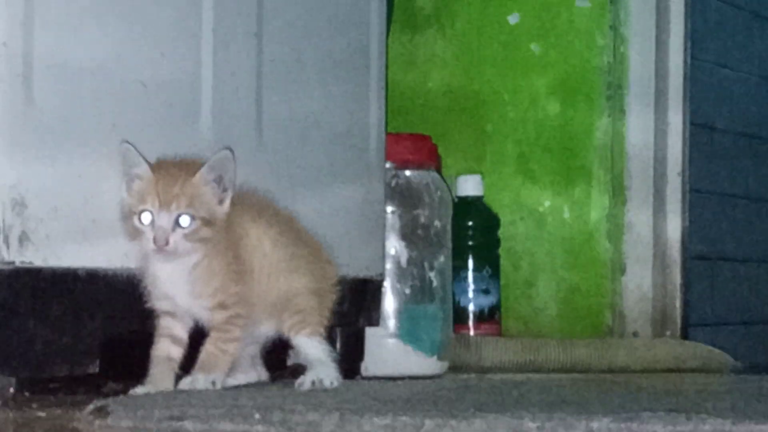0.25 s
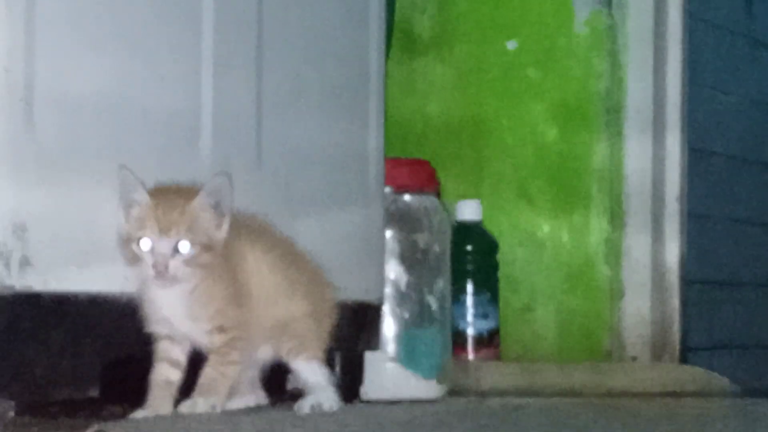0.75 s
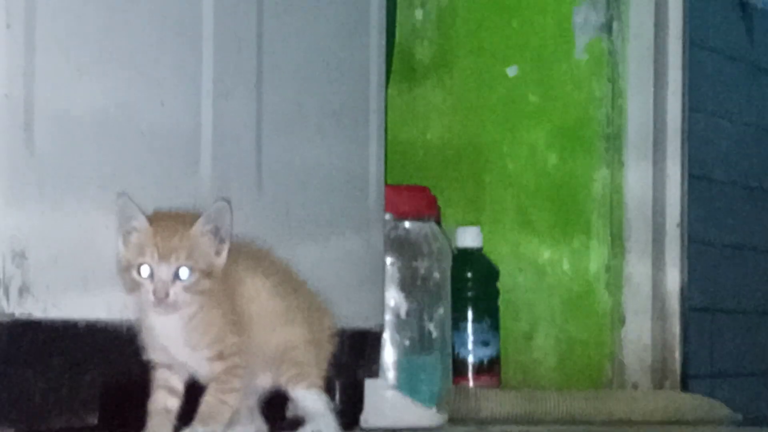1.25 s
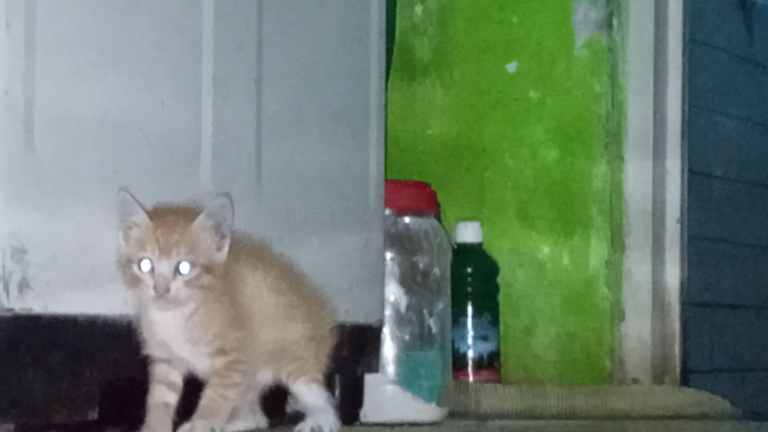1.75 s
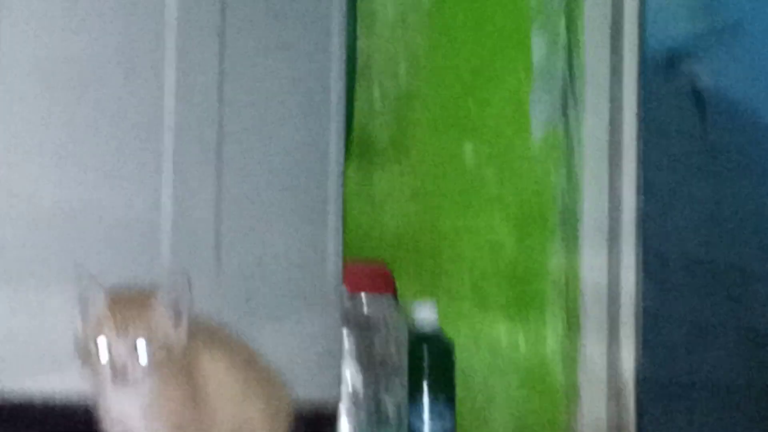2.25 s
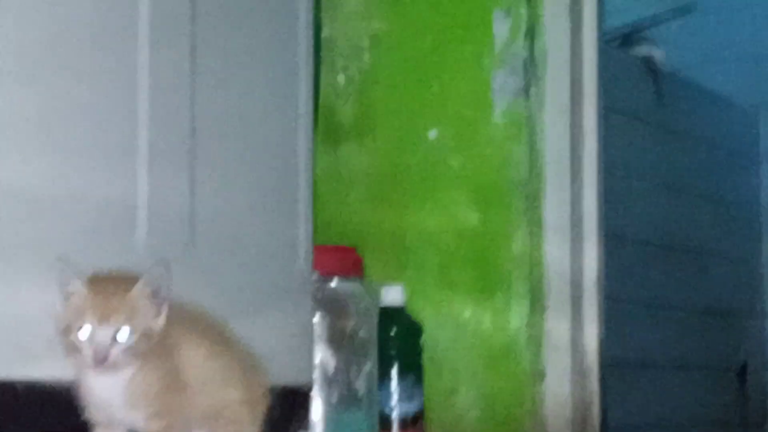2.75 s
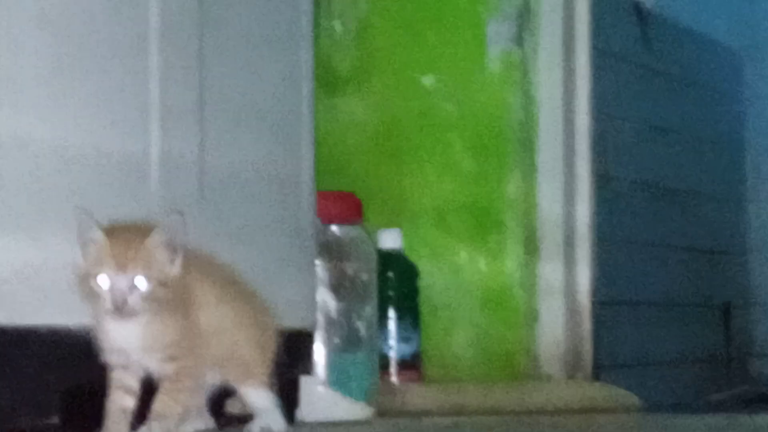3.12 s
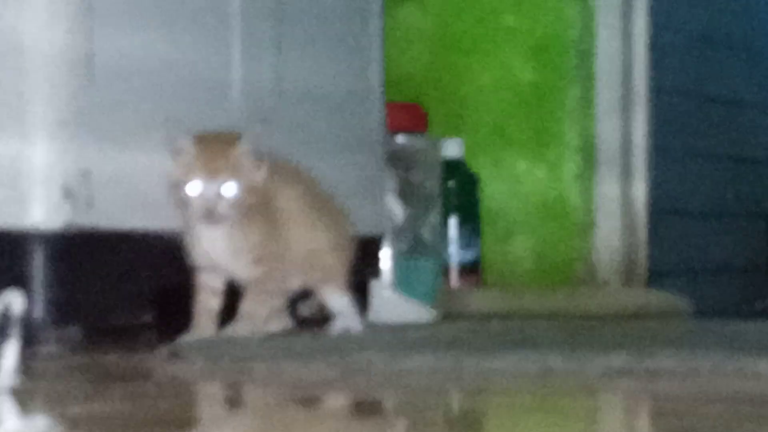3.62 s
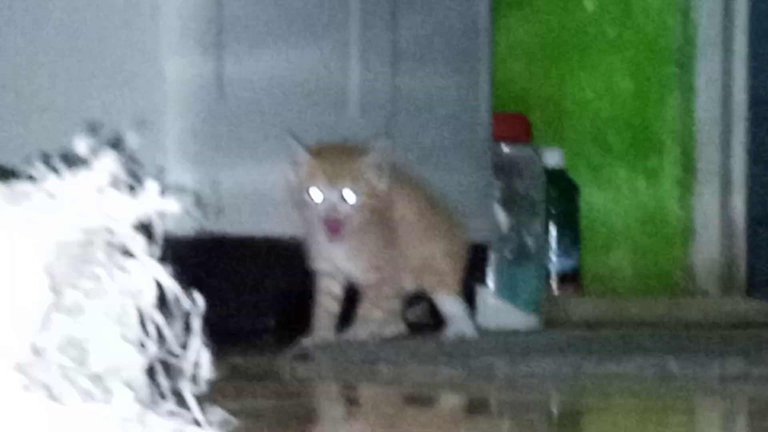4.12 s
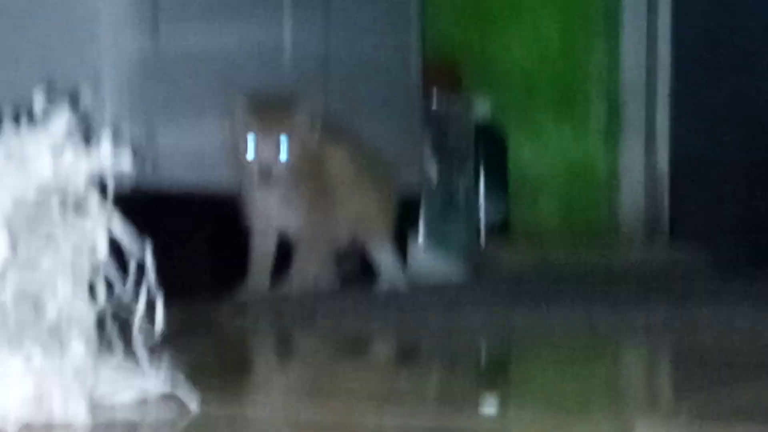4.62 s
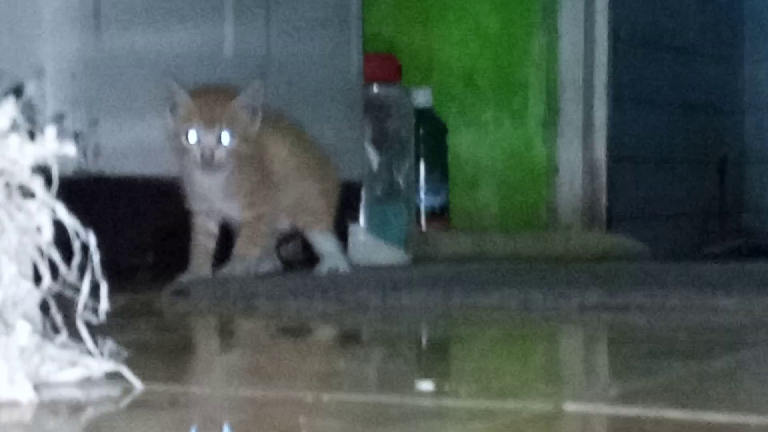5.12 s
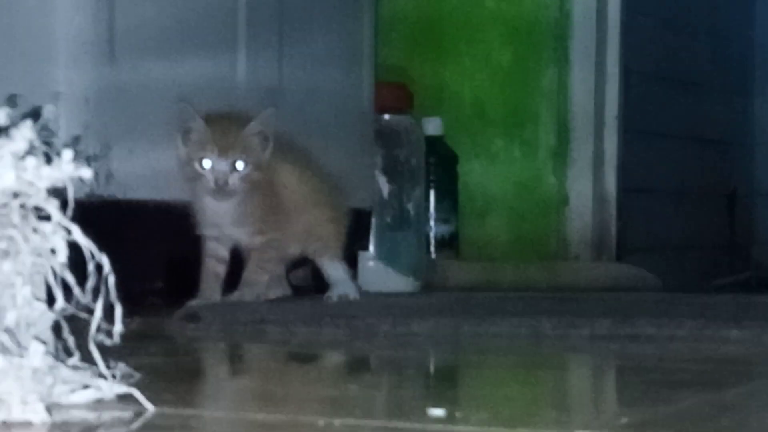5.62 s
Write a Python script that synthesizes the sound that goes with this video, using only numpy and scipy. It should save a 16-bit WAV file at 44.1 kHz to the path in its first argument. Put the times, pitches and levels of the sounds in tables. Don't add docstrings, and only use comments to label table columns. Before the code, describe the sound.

In a quiet tiled room at night, frogs and crickets chirr faintly outside. A small knock or two comes from the handheld microphone, then a kitten a few metres away growls low and long, opening into a rasp. Close mop strings scrape, rustle and snap, with dense scuffs and case knocks. A second, tenser growl rises near the end amid hard bright ticks.

```python
import sys
import numpy as np
from scipy import signal
from scipy.fft import rfft, irfft, next_fast_len
from scipy.io import wavfile
from scipy.ndimage import uniform_filter1d

SR = 44100
rng = np.random.default_rng(int(sys.argv[2]) if len(sys.argv) > 2 else 0)


def waveform_to_disk(signal):
    frames = np.transpose(np.atleast_2d(signal))
    scaled = np.clip(frames, -1, 1) * 32767
    samples = np.round(scaled).astype(np.int16)
    wavfile.write(sys.argv[1], SR, samples)


def convert_level_to_amplitude(level_db):
    exponent = np.asarray(level_db, float) / 20
    return 10 ** exponent


N = 258857
TIME = np.arange(N) / SR


def level(x, db=0):
    return x * convert_level_to_amplitude(db) / np.sqrt(np.mean(x ** 2))


def curves(table):
    s, *columns = np.transpose(table)
    return [np.interp(TIME, s, c, left=c[0] - 30) for c in columns]


def walk(rate):
    hold = int(SR / rate)
    steps = np.repeat(rng.standard_normal(N // hold + 1), hold)
    return 1.44 * uniform_filter1d(uniform_filter1d(steps, hold), hold)[:N]


def band(x, lo_hz, hi_hz, order=2):
    return signal.sosfilt(signal.butter(order, [lo_hz, hi_hz], "bandpass", fs=SR, output="sos"), x)


def colour(x, table):
    hz, db = np.transpose(table)
    size = next_fast_len(N)
    f = np.arange(size // 2 + 1) * SR / size + 1
    gain = convert_level_to_amplitude(np.interp(np.log(f), np.log(hz), db, left=-90, right=-90))
    return irfft(rfft(x, size) * gain, size)[:N]


def pulses(hz, jitter, scatter_db):
    period_luck, size_luck = rng.standard_normal((N // 40, 2)).T
    cycle = np.cumsum(hz * np.ones(N) / SR)
    uneven = np.exp(jitter * period_luck[cycle.astype(int)])
    cycle = np.cumsum(np.diff(cycle, prepend=0) * uneven)
    count = cycle.astype(int)
    clicks = np.diff(count, prepend=0) * convert_level_to_amplitude(scatter_db * size_luck[count])
    return clicks, cycle % 1


def ring(hz, t60, rise, size=300):
    t = np.arange(size) / SR
    build = np.clip(t / rise, 0, 1) ** 2
    decay = 10 ** (-3 * np.maximum(t - rise, 0) / t60)
    swing = np.sin(2 * np.pi * hz * t) * build * decay
    return swing / np.abs(swing).max()


def add(out, s, x):
    i = int(s * SR)
    out[i:i + len(x)] += x[:N - i]


# (frequency [Hz], level per Hz [dB])
ROOM_COLOUR = [(15, -60), (25, -9), (44, -14), (64, -5.5), (92, -9.5), (257, -19.5), (830, -23.5),
               (893, -24), (1820, -32), (2000, -27), (2600, -39), (4400, -120)]
# (time [s], length [s], centre [Hz], level [dB])
PATCHES = [(0., 0.068, 447, -72.5), (0.072, 0.068, 990, -67.5), (0.186, 0.12, 450, -75.5),
           (0.985, .05, 490, -64), (1.1, .11, 520, -70), (1.215, .075, 1420, -72), (1.325, .025, 160, -58),
           (1.43, .075, 620, -65), (2.28, .03, 1200, -73), (2.5, .22, 1380, -77), (2.78, .3, 335, -59),
           (5.19, .09, 260, -57), (5.36, .2, 265, -56), (5.36, .12, 900, -66), (5.468, .035, 130, -50),
           (5.18, .09, 1150, -69), (2.26, .2, 11200, -74), (2.52, .18, 11000, -73), (3.975, .035, 200, -50),
           (5.76, .11, 680, -60)]


def house():
    out = level(colour(rng.standard_normal(N), ROOM_COLOUR) * convert_level_to_amplitude(1.35 * walk(2.96)), -74)
    for s, length, hz, db in PATCHES:
        swell = np.hanning(int(length * SR))
        patch = level(band(rng.standard_normal(N // 10), hz / 1.12, hz * 1.13))
        add(out, s, convert_level_to_amplitude(db) * patch[:len(swell)] * swell)
    return out


# (frequency [Hz], level [dB])
SELF_NOISE = [(1500, -5), (4000, 3.5), (8000, -3), (11000, -5), (13500, -6.5), (15000, -4), (15800, -1),
              (16200, -14)]
# (time [s], level [dB])
WHINE = [
    (0, -99),
    (5.15, -88),
    (5.2, -71),
    (5.58, -80),
    (5.62, -92),
]


def electronics():
    hiss = level(colour(rng.standard_normal(N), SELF_NOISE) * convert_level_to_amplitude(1.0 * walk(5.7)), -78.5)
    whine_hz = 7690
    return hiss + convert_level_to_amplitude(curves(WHINE)[0]) * np.sin(2 * np.pi * whine_hz * TIME)


# (low edge [Hz], high edge [Hz], level over their curve [dB], pulses [per s], swell [dB])
FROGS = [(2208, 2450, -0.5, 110, 0.5), (2095, 2640, -8, 140, -3.5), (2882, 3440, -5.5, 150, -1),
         (4460, 5090, -13.5, 200, 1.5), (6080, 7260, -14, 340, 1)]
CRICKETS = [(8350, 9300, -4.5, 340, 1), (9180, 10200, -12, 170, 0.39), (7950, 10600, -16.5, 260, 0.71)]
# (time [s], low callers [dB], high callers [dB])
NIGHT = [
    (0.0, -62.5, -62),
    (2.71, -61, -61.5),
    (4.2, -60, -60),
    (5.17, -60, -69),
    (5.46, -59, -72.5),
    (5.87, -59.5, -68.5),
]


def chorus(callers, db):
    out = 0
    for lo_hz, hi_hz, own_db, rate, swell_db in callers:
        singers = 0
        for k in range(3):
            clicks, _ = pulses(rate * (1 + .2 * k), jitter=.15, scatter_db=5.5)
            singers = singers + clicks * (-1) ** k
        blur = level(singers) + 2.36 * rng.standard_normal(N)
        swell = convert_level_to_amplitude(swell_db * walk(4.0) + 0.76 * walk(25.04))
        out = out + level(band(blur, lo_hz, hi_hz, order=4), own_db) * swell
    return out * convert_level_to_amplitude(db)


def night():
    low_db, high_db = curves(NIGHT)
    return chorus(FROGS, low_db + 0.99) + chorus(CRICKETS, high_db - 0.13)


# (time [s], level [dB])
GRIP = [
    (0.0, -79.5),
    (5.48, -74.5),
    (5.87, -76),
]


def grip():
    rumble = band(rng.standard_normal(N), 45, 108) * convert_level_to_amplitude(2.8 * walk(42))
    return level(rumble) * convert_level_to_amplitude(curves(GRIP)[0] + 0.5)


# (time [s], pressure level [dB], speed [0-1])
DRAG = [(2.2, -80, 0.5), (2.35, -73, .7), (2.69, -69, 0.96), (2.735, -58.5, 1.03), (3.1, -63.5, 0.97),
        (3.48, -61, 1), (3.58, -53.5, 1), (3.73, -53, 1), (3.79, -57, 1.05), (3.83, -53.5, 1),
        (4.08, -54, 1.05), (4.64, -50, 0.84), (4.7, -54.5, 0.8), (4.712, -64, .55), (4.745, -62, 0.6),
        (4.755, -54.5, 0.92), (4.92, -45, 0.59), (5.165, -45.5, 0.6), (5.18, -64.5, .3), (5.58, -69, .05),
        (5.63, -69.5, .1), (5.87, -57.5, 0.2)]
# levels of scrape, swish and hiss [dB]
REST_DB = [-86.5, -93, -104]
# (fineness [0-2], scrape [dB], swish [dB], hiss [dB])
FINE = [(0, -0.5, -8.5, -33.5), (1, -11.5, 1, -3), (2, -7, -19, 5.5)]
# (time [s], peak level [dB], settling time [s], fineness [0-2])
JOLTS = [
    (0.766, -51, 0.035, 0),
    (0.795, -60, 0.027, 0),
    (1.082, -55, .13, .45),
    (1.575, -77, .05, 0.086),
    (2.149, -38, 0.018, 0.82),
    (5.279, -35.5, 0.074, 1),
]
# (time [s], length [s], level [dB], fineness [0-2])
STROKES = [(0.07, .11, -74, 0.18), (0.58, .36, -83, 1.6), (0.93, .07, -69, 1.7), (1.245, .03, -76, 0),
           (1.428, .055, -70, 0.13), (2.475, .04, -68, .8), (2.72, .1, -60, .2), (3.635, 0.066, -46, 1.0),
           (3.595, .035, -50, .9), (3.731, .022, -42, .8), (3.858, .028, -45, 1.2), (3.68, 0.047, -48.5, 0),
           (3.814, .06, -52, .1), (3.9, 0.075, -51, 1), (3.925, .045, -53, 0), (3.05, .03, -60, .8),
           (3.13, .08, -63, .9), (4.2, .04, -57, 0), (4.265, .045, -47, .7), (4.31, .055, -48, .7),
           (4.37, .08, -51, .9), (4.455, .04, -46.5, .7), (4.495, .045, -48, .8), (4.535, .055, -47, .7),
           (4.604, 0.052, -45.5, 0.85), (4.9, .1, -45, .8), (5.0, .05, -47, .5), (5.041, .085, -38.5, 0.26),
           (5.144, 0.045, -46, 0.48), (5.274, 0.088, -39, 0.83), (5.66, .03, -66, 1),
           (5.695, 0.12, -66, .6), (5.77, .13, -61, .1)]


def touch(power, s, shape, db, fineness):
    part = power[:, int(s * SR):][:, :len(shape)]
    fine, *mix_db = np.transpose(FINE)
    mix = np.array([np.interp(fineness, fine, m) for m in mix_db])
    part += convert_level_to_amplitude(2 * (db + mix))[:, None] * shape[:part.shape[1]]


def rub_levels():
    pressure, speed = curves(DRAG)
    contact_s, release_s = 2.72, 5.18
    loose = TIME < contact_s
    scrape = pressure - 5 - 6.5 * (loose | (TIME > release_s))
    swish = pressure - 2 * loose
    hiss = pressure - 37 * (1 - speed)
    power = convert_level_to_amplitude(2 * np.array([scrape, swish, hiss])) + convert_level_to_amplitude(2 * np.array(REST_DB))[:, None]

    rise_s, fade_db, edge_s = 0.0025, 30, 0.016
    for s, db, settle, fineness in JOLTS:
        t = TIME[:int(3 * settle * SR)]
        fade = convert_level_to_amplitude(-2 * fade_db * np.maximum(t - rise_s, 0) / settle)
        touch(power, s, np.clip(t / rise_s, 0, 1) ** 2 * fade, db, fineness)
    for s, length, db, fineness in STROKES:
        t = TIME[:int(length * SR)]
        shape = np.clip(np.minimum(t, length - t) / edge_s, 0, 1) ** 4
        touch(power, s, shape, db, fineness)
    db = 10 * np.log10(power)
    boom_limit_db = -55.5
    return [*db, np.minimum(db[0], boom_limit_db)]


# (frequency [Hz], level [dB])
SCRAPE = [(60, -21), (200, 0), (500, -4), (1000, 3.5), (1600, 3), (2500, -1), (3600, -4), (5000, -24)]
SWISH = [(1530, -17), (2600, -3.5), (2760, -3), (3230, -6.5), (3780, 1.5), (4450, 2), (5240, 1.5),
         (6630, 7), (7500, 1.5), (8500, -12), (11000, -46), (14300, -58), (22000, -120)]
HISS = [(4410, -43), (7500, 1), (8790, -2), (10700, -5.5), (13600, -6), (14400, -0.5), (15100, 9),
        (15900, -9), (16300, -28), (16500, -51)]
BODY = [(75, -34), (130, 0.5), (300, -5.5), (500, 2), (750, -15)]


def rub():
    out, pressure = 0, walk(130)
    # (colour, grain spread [dB], flicker [dB], gain [dB])
    layers = [(SCRAPE, 2.5, 1.5, 2.2), (SWISH, 1.6, .85, .6), (HISS, 1.5, 1.05, .6), (BODY, 2.5, 2.5, -3.5)]
    for db, (shape, grain_db, flicker_db, gain_db) in zip(rub_levels(), layers):
        sizes = np.minimum(rng.exponential(size=N // 24 + 1), 4.5)
        grains = rng.standard_normal(N) * convert_level_to_amplitude(grain_db * np.repeat(sizes, 24)[:N])
        flickering = colour(grains, shape) * convert_level_to_amplitude(flicker_db * pressure)
        out = out + level(flickering) * convert_level_to_amplitude(db + gain_db)
    return out


# (time [s], peak level [dB], centre [Hz])
SCUFFS = [(1.632, -67, 1350), (2.754, -43, 912), (2.791, -44, 1620), (2.805, -42, 1740), (2.889, -38, 1580),
          (2.94, -38, 1570), (3.048, -41, 970), (3.26, -47, 1040), (3.513, -39.5, 1800), (3.568, -41, 1210),
          (3.622, -36.5, 907), (3.658, -34.5, 1090), (3.694, -28.5, 885), (3.732, -42, 869),
          (3.816, -30, 1290), (3.87, -36, 1440), (3.944, -36.5, 830), (4.289, -43, 1000),
          (4.466, -41, 1000), (4.562, -37, 1040), (4.616, -50, 1730), (4.856, -30.5, 960),
          (4.907, -32, 1020), (4.974, -30.5, 872), (4.999, -28.5, 1140), (5.011, -37, 1320),
          (5.048, -43, 894), (5.068, -39, 1260), (5.095, -24, 1570), (5.164, -33, 1110)]


def scuffs():
    out, t = np.zeros(N), np.arange(1500) / SR
    for s, db, hz in SCUFFS:
        grit = rng.standard_normal(1500) * np.exp(-t / 0.0078)
        burst = band(grit, hz / 1.42, hz * 1.16, order=1)
        add(out, s + .0008, convert_level_to_amplitude(db - 2.5) * burst / np.abs(burst).max())
    return out


# (time [s], peak level [dB], pitch [Hz])
SNAPS = [(3.5768, -35, 2880), (3.6027, -33, 6640), (3.8681, -31, 8690), (3.9938, -37, 6550),
         (4.1194, -38, 7950), (4.2874, -35, 6410), (4.3244, -35, 6010), (4.3454, -34, 6590),
         (4.3694, -35, 3030), (4.3824, -35, 3850), (4.3904, -39, 6610), (4.4324, -37, 2660),
         (4.4712, -33, 6220), (4.4774, -35, 6470), (4.5164, -33, 6490), (4.5244, -32, 6650),
         (4.5624, -32, 6150), (4.5714, -32, 6490), (4.6174, -30, 6540), (4.6404, -29, 6410),
         (4.6444, -29, 6210), (4.6683, -36, 6560), (4.6844, -38, 4010), (4.7244, -45, 2500),
         (4.7516, -39, 3860)]
# (time [s], peak level [dB], pitch [Hz])
CRACKLES = [(3.53, -41, 1150), (3.573, -43, 969), (3.607, -42, 1250), (3.622, -39, 923), (3.635, -41, 904),
            (3.659, -35, 1040), (3.665, -35, 600), (3.672, -35, 1890), (3.695, -31, 921),
            (3.707, -35, 1150), (3.827, -38, 1210), (3.873, -39, 630), (3.94, -37, 622), (3.954, -40, 1040),
            (4.077, -42, 1670), (4.33, -40, 993), (4.439, -42, 1470), (4.694, -45, 1300)]


def snaps():
    out = np.zeros(N)
    for table, cycles, gain_db in [(SNAPS, 7.0, 1.5), (CRACKLES, 4.0, -1.5)]:
        for s, db, hz in table:
            add(out, s, convert_level_to_amplitude(db + gain_db) * ring(hz, t60=cycles / hz, rise=.6 / hz, size=600))
    return out


# (time [s], peak level [dB], sway level [dB], sway pitch [Hz])
PUSHES = [(0.765, -32, -19, 109), (0.795, -35, -14, 112), (1.0825, -26, -19, 157), (3.0847, -49, -5, 85),
          (3.515, -42, -6, 170), (3.8168, -27.5, -18, 1200), (4.9946, -22, -15, 1060),
          (5.0891, -37.5, -2, 450), (5.3162, -37.5, 3, 229), (5.357, -42, 1, 160)]
PULLS = [(0.976, -45.5, 9, 420), (1.4178, -37.5, -5.5, 157), (1.5748, -34, -5, 161),
         (2.1504, -34.5, -3.5, 110), (2.4897, -48, -2, 506), (3.7026, -35.5, -10, 880),
         (3.9134, -28, -13, 1130), (3.9236, -31, -12, 900), (4.2156, -35, -12, 1210),
         (4.7867, -36.5, -18, 543), (4.8295, -37.5, -4.5, 160), (4.8635, -30.5, -12, 780),
         (4.9751, -35.5, -0.5, 119), (5.1694, -41, 10, 102), (5.2789, -25.5, 0, 202),
         (5.3933, -40.5, -3, 159), (5.4739, -37, -14, 160), (5.488, -43.5, -6, 130),
         (5.5542, -37, -11, 1140), (5.851, -40, -2, 815)]


def knocks():
    out = np.zeros(N)
    samples, crack_t = np.arange(400) - 200, np.arange(600) / SR
    for way, table in [(1, PUSHES), (-1, PULLS)]:
        for s, db, sway_db, hz in table:
            snap_ms = min(.87 + .021 * sway_db, .78)
            if hz > 1000:
                snap_ms *= .52
            t = samples / SR / (snap_ms / 2000)
            add(out, s - 200 / SR, -way * convert_level_to_amplitude(db) * t * np.exp((1 - t ** 2) / 2))
            sway = ring(hz, t60=0.011 + 2.0 / hz, rise=0.00086, size=1800)
            add(out, s, -way * convert_level_to_amplitude(db + sway_db) * sway)
            crack = band(rng.standard_normal(600), 1600, 6100, order=3) * np.exp(-crack_t / 0.0022)
            add(out, s, convert_level_to_amplitude(db - 17.0) * crack)
    return out


# (time [s], peak level [dB], ring [Hz], lower ring level [dB], spark level [dB])
CASE_TICKS = [(2.7461, -24, 8900, -14, 3), (3.3931, -33, 5630, -13, -6), (3.741, -36, 6340, -2, -5),
              (3.873, -35, 6800, -9, 2), (4.383, -42, 9500, -3, 8), (5.269, -30, 6300, -4, -3),
              (5.28, -14.5, 6600, -24, -10), (5.586, -5.5, 6570, -17, -16), (5.6043, -7.5, 7270, -6.5, -5),
              (5.6723, -41, 6750, -6, 1), (5.685, -49, 6700, -3, 1)]
# (time [s], peak level [dB], lower ring [Hz], lower ring level [dB])
CLACKS = [(2.1509, -37, 890, 11.5), (2.488, -49, 1820, 3), (2.807, -45, 2180, 5), (2.89, -49, 1250, 14.5),
          (2.941, -34, 1660, 5.5), (3.056, -51, 1750, 11), (4.994, -46, 1310, 3), (5.0688, -26, 1300, 1),
          (5.0778, -24, 1390, 2), (5.097, -17.5, 1800, -2.5), (5.112, -24, 1420, -5)]


def tick(hz, low_hz, low_db, spark_db):
    modes = ring(hz, t60=0.0015, rise=0.00044) + convert_level_to_amplitude(low_db) * ring(low_hz, t60=0.0019, rise=0.00048)
    faint = ring(1300, t60=.002, rise=0.00033) + ring(11800, t60=0.0027, rise=0.00015)
    return modes + convert_level_to_amplitude(-23.5) * faint + convert_level_to_amplitude(spark_db) * ring(15200, t60=0.0022, rise=0.00013)


def ticks():
    out = np.zeros(N)
    for s, db, hz, low_db, spark_db in CASE_TICKS:
        add(out, s - .0004, convert_level_to_amplitude(db) * tick(hz, 0.448 * hz, low_db, spark_db))
    for s, db, low_hz, low_db in CLACKS:
        add(out, s - .0004, convert_level_to_amplitude(db) * tick(4410, low_hz, low_db, spark_db=-17))
    return out


# (time [s], effort level [dB], mouth opening [0-1])
GROWLS = [
    [(0.92, -88, .1), (1.0, -61, 0.07), (1.635, -63, .1), (1.66, -51.5, 0.43), (1.86, -58.5, .56),
     (2.7, -55.5, 0.71), (2.82, -56.5, 1), (3.19, -55.5, 0.99), (3.45, -79.5, 0.7)],
    [(4.74, -70, .6), (4.85, -54, 0.33), (5.08, -51.5, 0.55), (5.28, -51, .65), (5.53, -54, .65),
     (5.6, -56.5, 0.76), (5.66, -51.5, 0.64), (5.78, -53, 0.59), (5.87, -50.5, 0.72)],
]


def growl_levels():
    efforts, openings = [], []
    for growl in GROWLS:
        s, db, opening = np.transpose(growl)
        efforts.append(np.interp(TIME, s, db, left=-120, right=-120))
        openings.append(np.interp(TIME, s, np.clip(opening, .05, 1)))
    opening = np.choose(np.argmax(efforts, axis=0), openings)
    effort, wide = np.max(efforts, axis=0), np.log10(opening)

    catch_s, catch_end_s, catch_hz = 1.648, 1.815, 18
    beat = np.cos(2 * np.pi * catch_hz * (TIME - catch_s))
    catch = -13 * (1 + beat) / 2 * ((TIME > catch_s) & (TIME < catch_end_s))
    caught = catch < 0
    chest = effort - 3 - 16 * opening ** 2 - 8 * caught
    throat = effort + 24 * wide + catch
    mouth = effort - 3.5 + 30 * wide + catch - 5 * caught
    return chest, throat, mouth


# (time [s], pitch [Hz], level over their cavity [dB])
CHEST_NOTE = [(1.0, 164, 1), (1.65, 166, 0), (1.85, 180, -4), (1.95, 187, 1), (2.2, 194, 0), (2.4, 190, 8),
              (2.62, 190, 8), (2.8, 185, -4), (5.0, 200, 0), (5.6, 204, 0), (5.68, 203, 4), (5.87, 201, 6)]
THROAT_NOTE = [(1.65, 445, 4), (1.8, 440, 2), (1.95, 395, -7), (2.25, 400, -6), (2.4, 412, 1),
               (2.58, 462, -3), (2.72, 435, -8), (2.87, 455, 0), (2.97, 410, -4), (3.17, 455, 1),
               (3.3, 450, -8), (5.05, 450, -4), (5.17, 452, 3), (5.27, 485, 3), (5.43, 480, 4),
               (5.57, 445, 3), (5.63, 408, 1), (5.75, 420, 1), (5.87, 425, -3)]


def growl_notes():
    chest_db, throat_db, _ = growl_levels()
    out = 0
    for db, note in [(np.minimum(chest_db, throat_db), CHEST_NOTE), (throat_db, THROAT_NOTE)]:
        hz, own_db = curves(note)
        phase = 2 * np.pi * np.cumsum(hz * (1 + .016 * walk(14))) / SR
        tremble_db = 1.3 * walk(14) + 2.2 * walk(45)
        out = out + convert_level_to_amplitude(db + own_db + tremble_db) * np.sin(phase)
    return out


# (pitch [Hz], width [Hz], level [dB])
CHEST = [(192.8, 38.6, -3), (154, 83, -3.5)]
THROAT = [(450.7, 49, 0), (373.3, 60, -1), (511, 59, -5), (295, 95, -9.5)]
MOUTH = [(567, 47, -1), (640, 66, -4), (703, 62, -3.5), (802, 78, -11)]


def kitten():
    flap_hz = 95.33
    flaps, phase = pulses(flap_hz, jitter=.35, scatter_db=2.5)
    air = np.exp(-phase / 0.67) * rng.standard_normal(N)
    source = (level(flaps) + 0.6 * level(air)) * convert_level_to_amplitude(1.0 * walk(22.1))
    out = 0
    for db, cavity in zip(growl_levels(), [CHEST, THROAT, MOUTH]):
        rings = 0
        for hz, width, own_db in cavity:
            tremble = convert_level_to_amplitude(own_db + 1.4 * walk(6.5))
            rings = rings + tremble * band(source, hz - width / 2, hz + width / 2, order=3)
        out = out + convert_level_to_amplitude(db) * level(rings)
    return out + growl_notes()


def scene():
    background = house() + electronics() + night()
    handling = grip() + rub() + scuffs() + snaps() + knocks() + ticks()
    return (background + handling + kitten())[None]


# (frequency [Hz], level per bin [dB])
HUSH_DB = [(60, -100), (1500, -100), (5000, -101), (11000, -104), (16000, -108)]


def hush(x):
    f, _, z = signal.stft(x, SR, nperseg=1024)
    hz, db = np.transpose(HUSH_DB)
    power = uniform_filter1d(np.abs(z) ** 2, size=3, axis=-1)
    power = uniform_filter1d(power, size=3, axis=-2)
    gain = power / (power + convert_level_to_amplitude(2 * np.interp(f, hz, db))[:, None])
    return signal.istft(z * np.maximum(gain, convert_level_to_amplitude(-18)), SR, nperseg=1024)[1][..., :N]


def duck(x):
    limit, depth, recovery_s = 0.16, 770, 0.019
    keep = np.exp(-1 / (recovery_s * SR))
    over = signal.lfilter([1 - keep], [1, -keep], np.maximum(np.abs(x) - limit, 0))
    return x / (1 + depth * np.roll(over, shift=60))


def low_pass(x):
    return signal.sosfilt(signal.butter(12, 17110, fs=SR, output="sos"), x)


def record(dry):
    x = signal.sosfilt(signal.butter(3, 55.6, "highpass", fs=SR, output="sos"), dry)
    x = hush(duck(x))
    x = signal.sosfiltfilt(signal.ellip(6, .2, 14, 15900, fs=SR, output="sos"), x)
    return low_pass(x)


dry = scene()
out = record(dry)
waveform_to_disk(out)
```